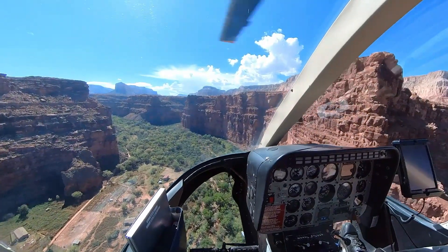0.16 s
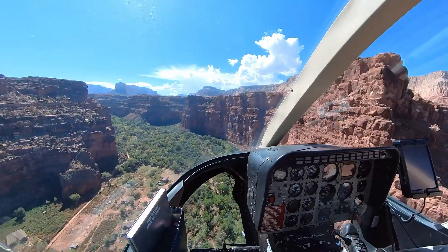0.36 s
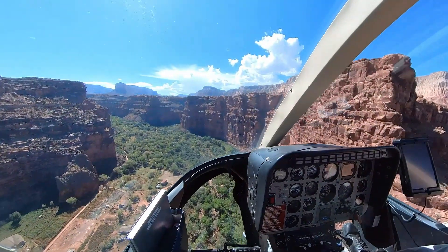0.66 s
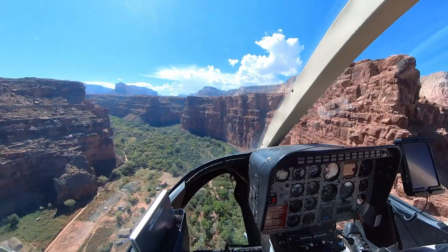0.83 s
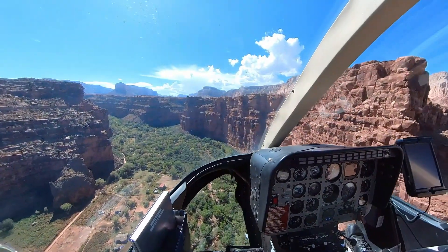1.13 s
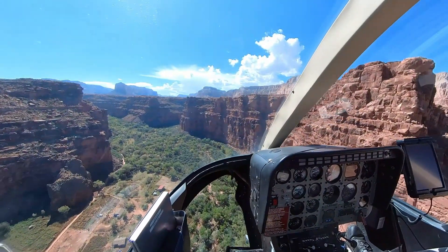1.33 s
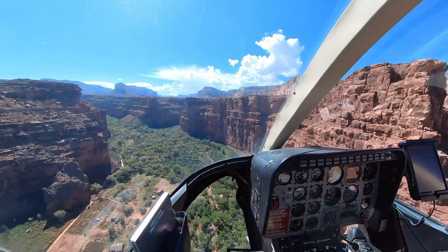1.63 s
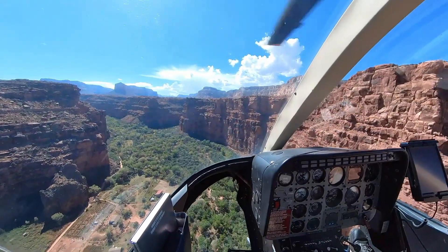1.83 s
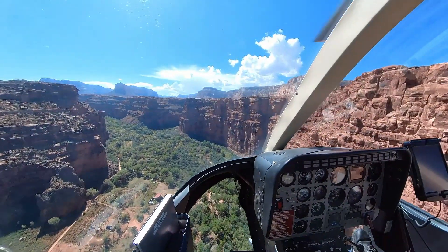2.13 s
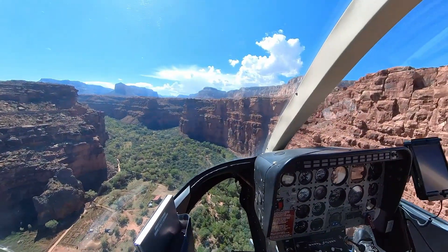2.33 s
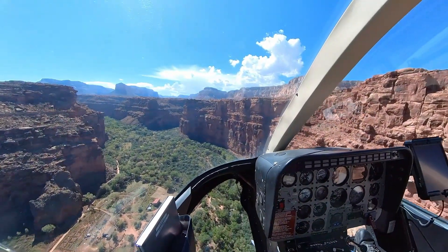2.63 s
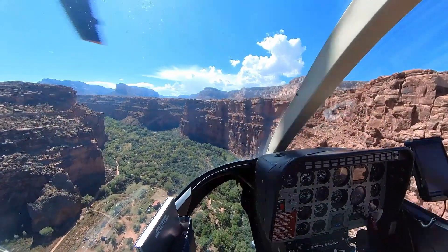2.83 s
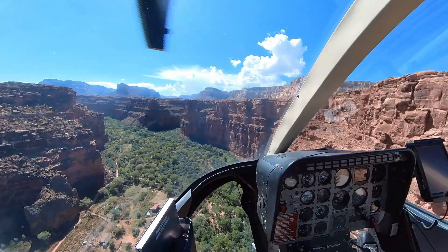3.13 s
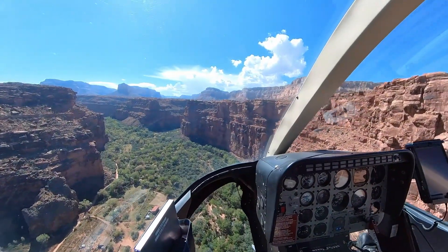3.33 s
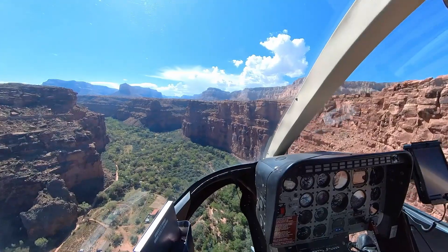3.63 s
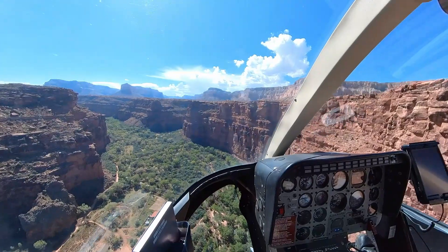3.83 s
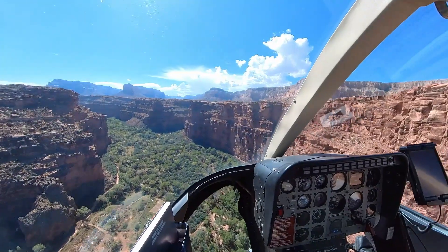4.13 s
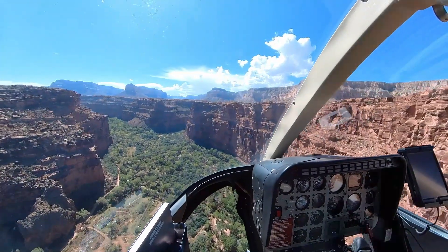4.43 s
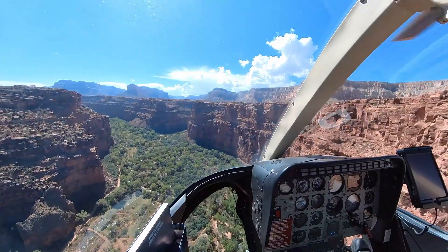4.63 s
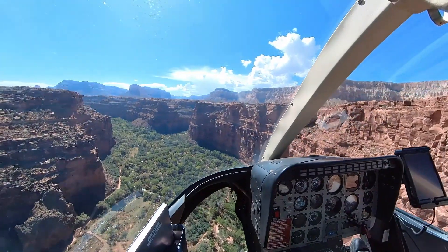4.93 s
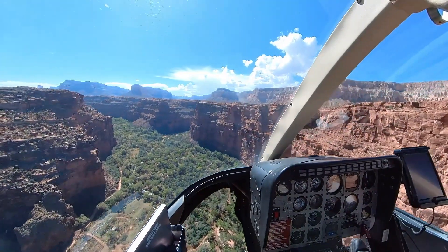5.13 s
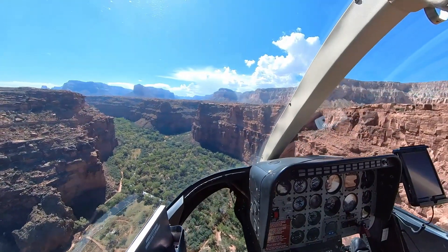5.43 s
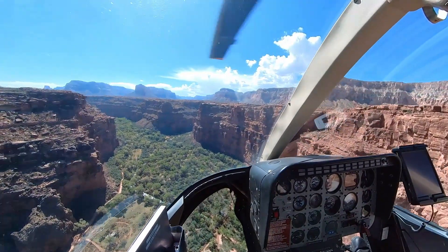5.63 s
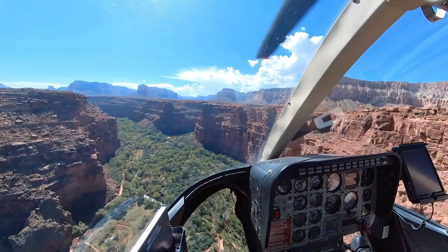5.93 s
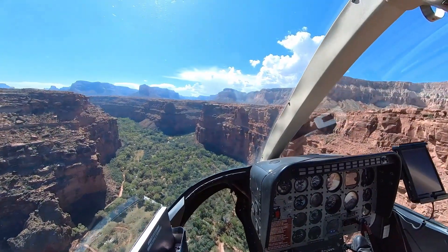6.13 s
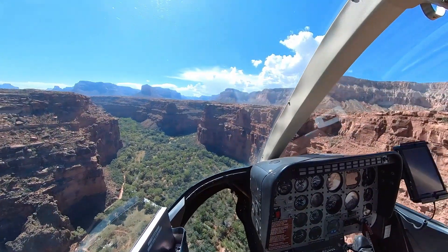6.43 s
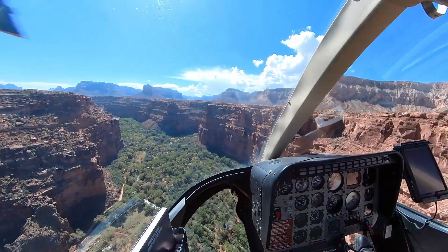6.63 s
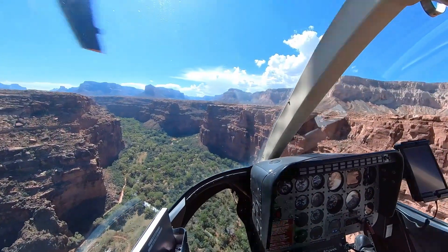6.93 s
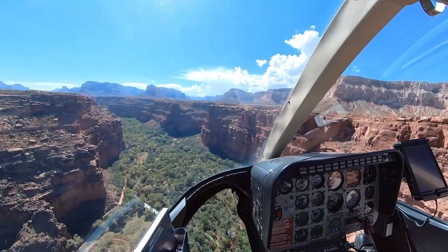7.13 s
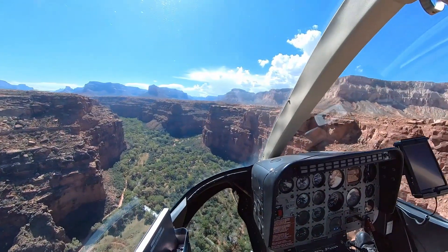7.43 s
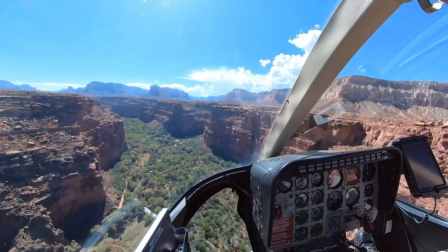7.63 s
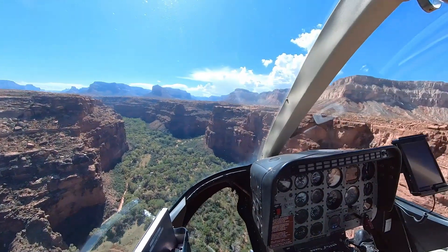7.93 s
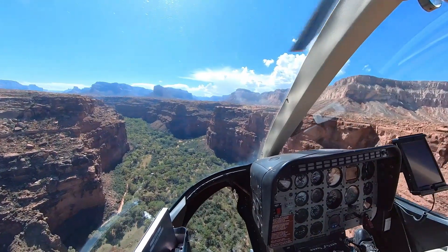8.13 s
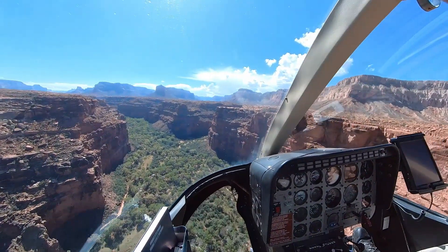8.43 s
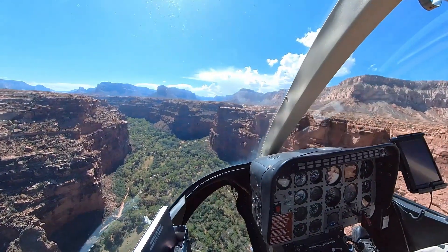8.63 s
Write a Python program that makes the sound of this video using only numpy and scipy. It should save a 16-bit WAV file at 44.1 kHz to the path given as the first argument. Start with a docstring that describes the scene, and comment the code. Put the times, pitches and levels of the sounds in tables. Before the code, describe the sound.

Inside a helicopter cockpit in cruise, rotor blades thump about thirteen times a second over steady droning, gear whine and pulsing wind hiss.

```python
"""Blades thump the cabin thirteen times a second, between deep boom and hard slap, each with a gust of hiss.
We sit inside the cockpit of a two-bladed turbine helicopter in cruise, the microphone close to it all.
Each thump is a set of short pressure swings; tail rotor, drive shaft, gears and turbine are wavering sines.
The slipstream is coloured noise: a rumble in the cabin, a roar on the canopy and a hiss at its seams."""
import sys
import numpy as np
from scipy.fft import rfft, irfft, next_fast_len
from scipy.io import wavfile
from scipy.ndimage import uniform_filter1d, minimum_filter1d, map_coordinates

SR = 44100
rng = np.random.default_rng(int(sys.argv[2]) if len(sys.argv) > 2 else 0)


def persist_wave(psi):
    """Save psi, clipped to +-1, as 16-bit WAV."""
    counts = np.round(np.clip(psi, -1, 1) * 32767).astype(np.int16)
    wavfile.write(sys.argv[1], SR, np.atleast_2d(counts).T)


N = 386757

BLADE_HZ, SHAFT_HZ = 13.175, 100.2  # main blade passages and drive shaft turns per second


def amp(db):
    """Decibels to gain."""
    return 10 ** (np.asarray(db) / 20)


def unit(x):
    """Scale to rms 1."""
    return x / np.sqrt(np.mean(x ** 2) + 1e-20)


def along(points, hz):
    """Read (f/Hz, value) points on a log frequency axis."""
    f, v = np.transpose(points)
    return np.interp(np.log(hz + 1e-3), np.log(f), v)


def curves(rows):
    """One value per sample for each column after the time."""
    times, *columns = np.transpose(rows)
    return [np.interp(np.arange(N) / SR, times, column) for column in columns]


def wobble(rate, size=32):
    """A smooth random curve with rate knots a second, drawn every size samples."""
    at = np.arange(0, N + size, size)
    knots = rng.standard_normal(int(N * rate / SR) + 4)
    coarse = map_coordinates(knots, [at * rate / SR])
    return np.interp(np.arange(N), at, coarse)


def filtered(x, response):
    """Multiply the spectrum of x by a response of frequency."""
    size = next_fast_len(N + SR)  # spare second against wrap-around
    hz = np.fft.rfftfreq(size, 1 / SR)
    return irfft(rfft(x, size) * response(hz), size)[:N]


def noise(spectrum):
    """Coloured noise of rms 1."""
    return unit(filtered(rng.standard_normal(N), lambda hz: amp(along(spectrum, hz))))


def tone(cycles, waver_db, waver_rate):
    """A sine of rms about 1 whose strength wavers."""
    sine = np.sin(2 * np.pi * (cycles + rng.random()))
    return np.sqrt(2) * sine * amp(waver_db * wobble(waver_rate))


def swing(passes, hz, width, scatter_db):
    """One short pressure swing per blade, centred on whole passes, fading to 1/e width s either side; rms 1."""
    blade = np.round(passes).astype(int)
    age = (passes - blade) / BLADE_HZ  # s from the nearest centre
    blade_sizes = amp(scatter_db * rng.standard_normal(np.ptp(blade) + 1))
    size = blade_sizes[blade - blade.min()]
    return unit(size * np.cos(2 * np.pi * hz * age) * np.exp(-(age / width) ** 2))


def main_rotor(passes):
    """Each blade brings a sharp suction edge and a deep boom; near the wake they give way to a harder slap."""
    # how near the blades run to their own wake: t/s, nearness (0 = clear air, 1 = in the wake)
    wake_points = [(0.0, 0.64), (0.38, 0.89), (0.55, 0.028), (2.9, 0.033), (4.2, .4), (4.6, 0.68),
                   (5.05, 0.56), (5.5, 0.9), (8.75, 0.77)]
    boom_db, slap_db = -25.5, -27.5
    edge_db = -8.5  # against the boom
    wake = np.clip(curves(wake_points)[0], 0, 1)
    edge = -swing(passes - .03, hz=79.6, width=.007, scatter_db=3.5)
    boom = swing(passes - .19, hz=37, width=.0195, scatter_db=0.7)
    slap = -swing(passes - .49, hz=50.4, width=.014, scatter_db=1.2)
    clear_air = amp(boom_db) * (boom + amp(edge_db) * edge)
    return np.sqrt(1 - wake) * clear_air + np.sqrt(wake) * amp(slap_db) * slap


def gusts(passes):
    """Strength of the air gust on the canopy, about -1 to 1; it arrives abruptly and ebbs slowly."""
    # one gust: share of the blade period, strength
    gust_shape = [(.03, -0.95), (.21, -1.1), (.31, 0.81), (0.449, 1), (.66, 0.47), (0.819, -0.51)]
    trail_from_s, trail_per_s = 7.27, .13  # gusts begin to trail the blades; blade periods per s
    lag = trail_per_s * np.maximum(np.arange(N) / SR - trail_from_s, 0)
    share, strength = np.transpose(gust_shape)
    return np.interp(passes - lag + .5 + 0.013 * wobble(19), share, strength, period=1)


def drone(clock, flow_db):
    """Harmonics of the tail rotor, which works harder in more airflow, and of the engine's drive shaft."""
    # tail rotor harmonics: multiple of its blade rate, level/dB before the overall tail level
    tail_harmonics = [(1, -19), (2, 1), (3, -14), (4, -17), (5, -40.5), (6, -26.5), (7, -32)]
    # drive shaft harmonics: multiple of its turning rate, level/dB
    shaft_harmonics = [(1, -33), (2, -43), (3, -57)]
    tail_hz, tail_db, tail_growth = 85.16, -32.5, 0.86  # growth in dB per dB of airflow
    tail = sum(amp(db) * tone(round(k) * tail_hz * clock, waver_db=.5, waver_rate=7)
               for k, db in tail_harmonics)
    shaft = sum(amp(db) * tone(round(k) * SHAFT_HZ * clock, waver_db=0.4, waver_rate=2.4)
                for k, db in shaft_harmonics)
    return amp(tail_db + tail_growth * flow_db) * tail + shaft


def whines(clock, gust, flow_db):
    """Gear teeth and turbine sing; every blade loads the drive and makes the stronger whines flutter."""
    # lesser gearbox hums and whines: f/Hz, level/dB
    gears = [(113.4, -45), (194.7, -48.5), (596.2, -61.5), (631.5, -65.5), (658.1, -65), (829.5, -56.5),
             (857.3, -70), (986.6, -57), (1289.3, -68), (1316.2, -71.5), (1480.4, -65.5), (1658.1, -76),
             (1702.5, -69), (1934, -68.5), (1973, -72.5), (2003.9, -78)]
    # turbine and accessory whines: f/Hz, level/dB before the trim and flutter below
    turbine_tones = [(493.4, -69), (1947.4, -64.5), (2103.8, -76), (2467, -80), (2604.6, -73),
                     (2960.8, -79), (6627, -79), (7714, -92), (8286, -100)]
    # swells of the pinion whine: middle t/s, half length to 1/e in s, rise/dB
    swells = [(1.75, 0.56, 4.5), (4.15, 1.3, 6.5), (6.2, .4, 2.5)]
    planetary_hz, planetary_db, planetary_growth = 644.7, -48, 0.48  # growth in dB per dB of airflow
    pinion_teeth, pinion_db = 19, -60.5  # level between swells, before flutter

    planetary_level = amp(planetary_db + planetary_growth * flow_db + 0.24 * gust)
    planetary = planetary_level * tone(planetary_hz * clock + 0.015 * gust, waver_db=0.1, waver_rate=7)

    swell_db = sum(db * np.exp(-((clock - s) / half) ** 2) for s, half, db in swells)
    twist = gust / (4 * np.pi)  # cycles by which the loaded pinion runs ahead
    pinion = tone(pinion_teeth * SHAFT_HZ * clock + twist, waver_db=1.7, waver_rate=25)
    pinion = amp(pinion_db + swell_db + 2.9 * gust) * pinion

    mesh = sum(amp(db) * tone(hz * clock, waver_db=0.7, waver_rate=5.2) for hz, db in gears)
    turbine = sum(amp(db) * tone(hz * clock + 0.073 * wobble(11), waver_db=1.0, waver_rate=11)
                  for hz, db in turbine_tones)
    return planetary + pinion + mesh + amp(-0.5 + 1.3 * gust) * turbine


def slipstream(gust, flow_db):
    """Air rumbles in the cabin, roars on the canopy and hisses at its seams in time with the blades."""
    # colours of the three air noises: f/Hz, relative level/dB
    rumble_colour = [(8, -30.5), (20, -24), (32, -1.5), (46, 2.5), (75, -2), (110, -1), (150, -4),
                     (218, -3), (245, -12.5), (320, -14.5), (420, -31), (900, -83)]
    roar_colour = [(200, -25), (360, -0.5), (450, 1), (550, -3), (620, 0.5), (770, -.5), (830, -4),
                   (950, -7), (1100, -12), (1450, -13.5), (2000, -15), (2500, -19), (5000, -29.5),
                   (9000, -65.5)]
    hiss_colour = [(500, -30), (1200, 4.5), (2200, 0), (3000, 3), (3700, 2), (5300, 2.5), (6100, 2),
                   (7000, -3.5), (7700, -10.5), (8300, -16.5), (9000, -28), (9600, -43)]
    # base level in dB, growth in dB per dB of airflow
    rumble_db, rumble_growth = -30, .7
    roar_db, roar_growth = -44.5, .8
    hiss_db, hiss_growth = -60, 1.05  # per seam
    rumble_level = amp(rumble_db + rumble_growth * flow_db + 1.7 * gust + 0.25 * wobble(3))
    roar_level = amp(roar_db + roar_growth * flow_db + 0.96 * gust + 0.78 * wobble(11))
    hiss = 0
    for _ in range(2):  # two seams, each with its own eddies
        eddies_db = 1.4 * wobble(40) + 0.82 * wobble(160)
        hiss = hiss + amp(5.05 * gust + eddies_db) * noise(hiss_colour)
    hiss_level = amp(hiss_db + hiss_growth * flow_db)
    return rumble_level * noise(rumble_colour) + roar_level * noise(roar_colour) + hiss_level * hiss


def limiter(x, size=600):
    """Turn the gain down briefly, over size samples, around peaks that would pass the ceiling."""
    ceiling = .22
    needed = ceiling / np.maximum(np.abs(x), ceiling)
    return x * uniform_filter1d(minimum_filter1d(needed, size), size)


def scene():
    """One drive train turns everything, so all tones drift together; one airflow moves the levels."""
    # airflow over the canopy, for the air noises and the drive train's load: t/s, level/dB over steady cruise
    airflow = [(0.0, -2), (0.15, 2), (0.4, 1.5), (0.55, -2.5), (2.3, -0.5), (2.9, -4), (3.6, -0.5),
               (4.3, -1.4), (5.0, 0.26), (6.3, 2), (7.05, 0.8), (7.55, 1.2), (8.75, 0.5)]
    clock = np.cumsum(1 + 0.000499 * wobble(0.882)) / SR  # s, drifting slightly
    passes = BLADE_HZ * clock - 1 / 4  # blade passages so far
    gust = gusts(passes)
    flow_db, = curves(airflow)
    machinery = main_rotor(passes) + drone(clock, flow_db) + whines(clock, gust, flow_db)
    return (machinery + slipstream(gust, flow_db))[None]


def record(dry):
    """The microphone's recorder holds down the strongest thumps and keeps nothing above its band limit."""
    top_hz = 9600
    return np.array([filtered(limiter(channel), lambda hz: hz < top_hz) for channel in dry])


dry = scene()
out = record(dry)
persist_wave(out)
```